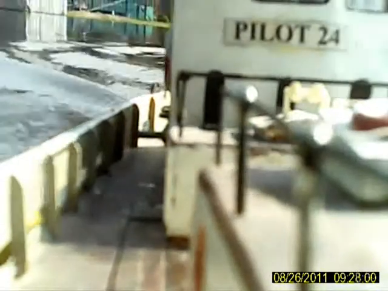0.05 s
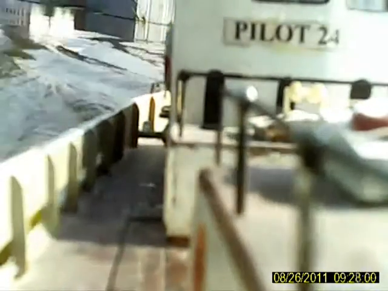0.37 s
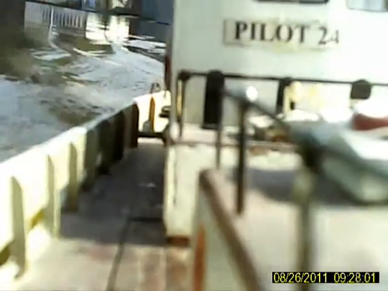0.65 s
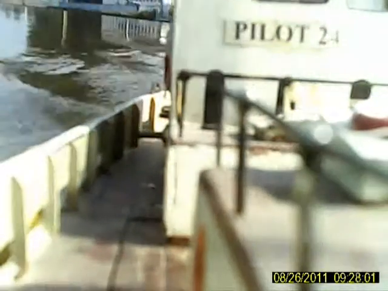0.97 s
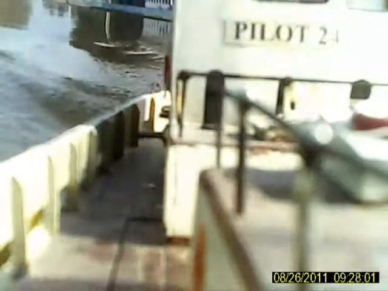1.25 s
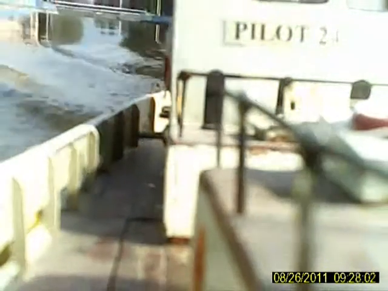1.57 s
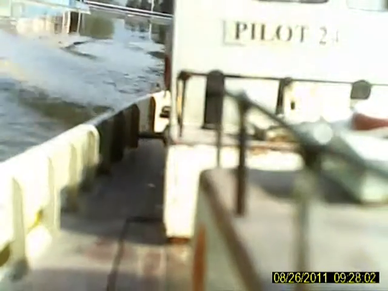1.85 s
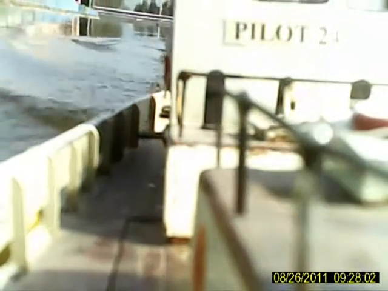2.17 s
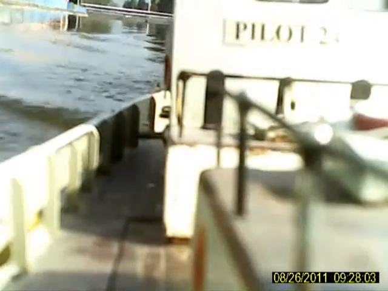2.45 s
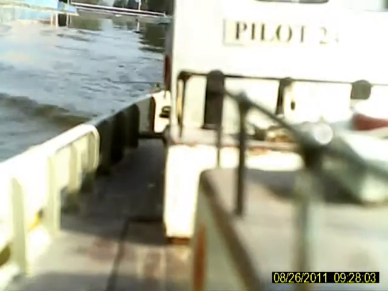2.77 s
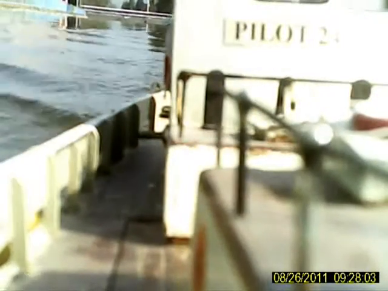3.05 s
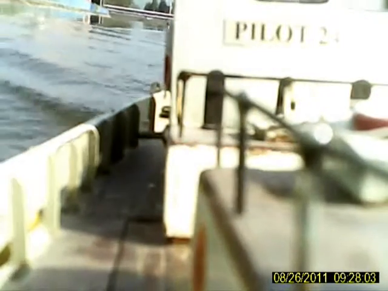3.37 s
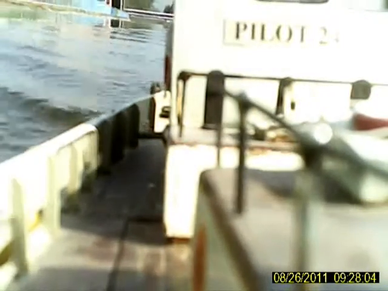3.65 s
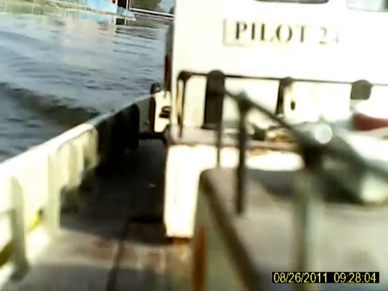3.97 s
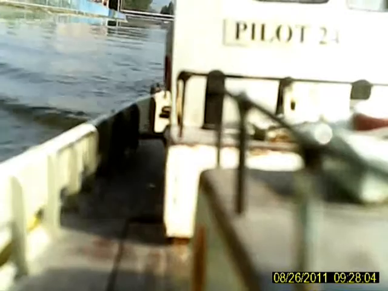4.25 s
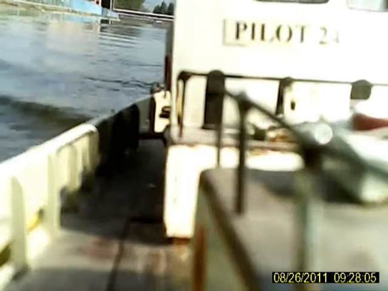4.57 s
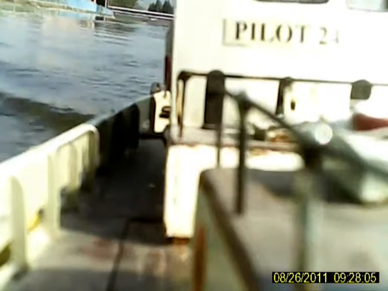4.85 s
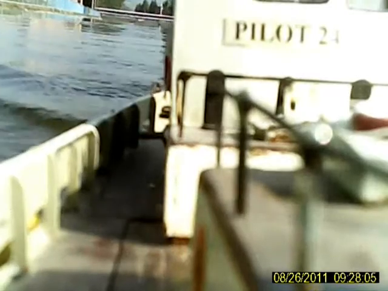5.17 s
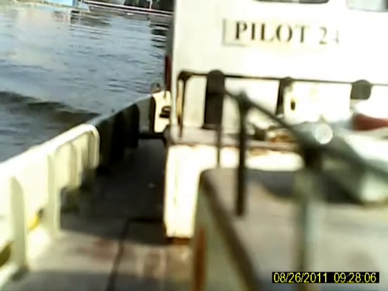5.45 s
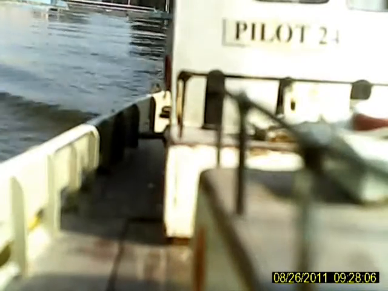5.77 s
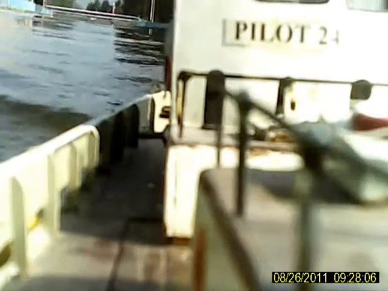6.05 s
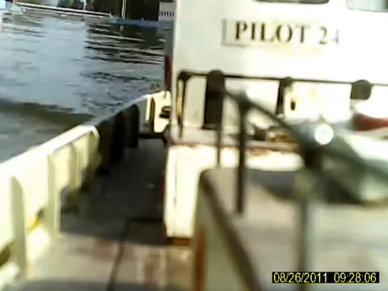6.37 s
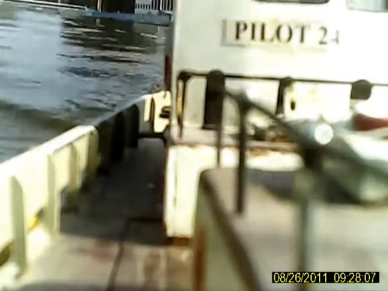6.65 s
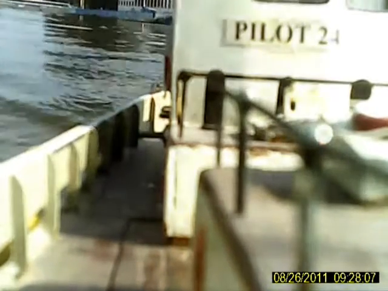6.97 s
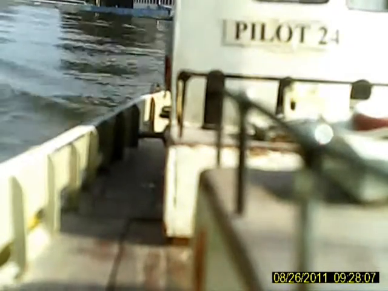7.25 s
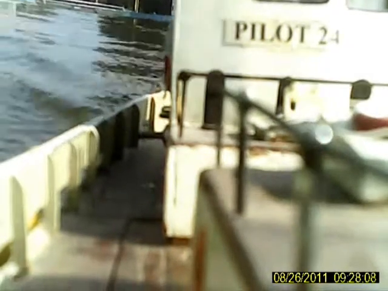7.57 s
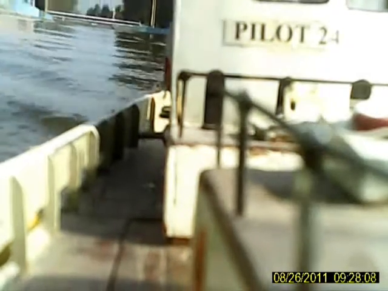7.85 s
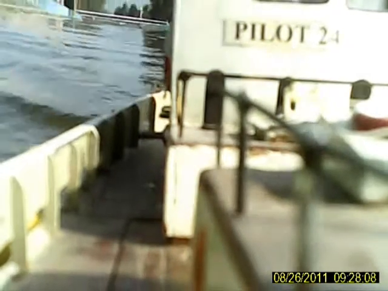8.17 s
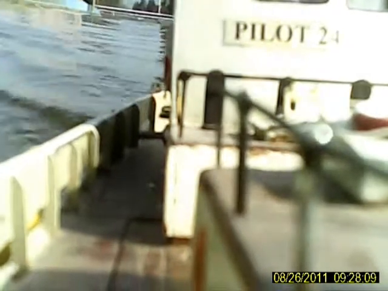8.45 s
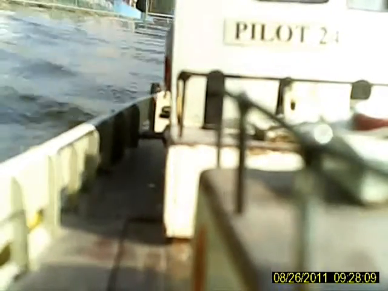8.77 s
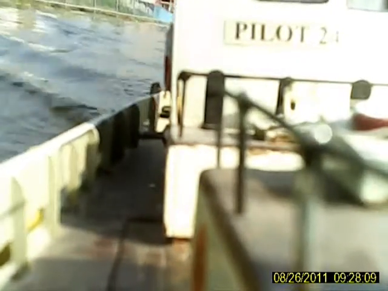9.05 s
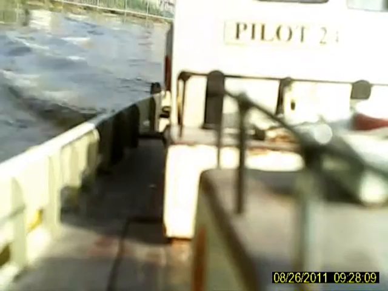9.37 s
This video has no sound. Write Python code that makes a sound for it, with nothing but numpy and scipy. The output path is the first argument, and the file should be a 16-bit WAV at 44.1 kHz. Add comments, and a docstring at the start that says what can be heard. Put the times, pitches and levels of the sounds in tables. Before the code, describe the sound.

A model boat's small geared electric motor whines from start to finish, about nine and a half seconds, heard very close from the deck. The whine is high and buzzy, with a fast, even flutter. A fine gear rattle, a thin electrical whistle and a fizzy hiss ride on it, growing slightly stronger when the motor runs faster. The pitch climbs a little over the first second or so, dips around 1.7 seconds, rises again near 2.3 and then wanders gently. Tiny upward blips come at about 4.6, 6.7 and 7.6 seconds. The motor sags to its lowest near 8.8 seconds and picks up just after 9. Underneath, water washes quietly along the hull, with soft, dull wavelet knocks at roughly 1.5, 2.6, 3.7 and 4.5 seconds and fainter ones near 5.7 and 6.8.

```python
"""A model boat's geared motor whines across calm water, heard close up from a small camera on deck.
The speed controller feeds it 38 pulses a second, so the whine swoops through the hull's resonances.
Around it the gears rattle, the brushes spark and the controller whistles; underneath, water washes
and knocks on the hull. The camera samples its microphone coarsely, which adds a fizzy top."""
import sys
import numpy as np
from scipy import signal
from scipy.fft import rfft, irfft, next_fast_len
from scipy.io import wavfile
from scipy.ndimage import map_coordinates

SR = 44100
rng = np.random.default_rng(int(sys.argv[2]) if len(sys.argv) > 2 else 0)


def dump(signal):
    """Clip the signal to [-1, 1] and save it as 16-bit WAV at the path in sys.argv[1]."""
    limited = np.clip(np.atleast_2d(signal).T, -1, 1)
    pcm = np.round(limited * 32767).astype(np.int16)
    wavfile.write(sys.argv[1], SR, pcm)


N = 419391
TIME = np.arange(N) / SR

# motor speed, as the mean rate of gear teeth meeting: (time [s], tooth rate [Hz])
MOTOR_SPEED = [(0.0, 704), (0.18, 699.4), (0.56, 790.4), (0.97, 778), (1.21, 831.6), (1.46, 756.6),
               (1.78, 744), (1.95, 794.6), (2.28, 813.3), (2.9, 741.5), (3.41, 769.3), (3.88, 767.6),
               (4.04, 732), (4.73, 701), (5.38, 700.2), (5.88, 764.4), (6.25, 742), (6.63, 779.4),
               (7.21, 706), (8.16, 682), (8.43, 690), (8.84, 653), (9.12, 762), (9.5, 748.5)]
# brief surges and stumbles of the motor: (time [s], change of tooth rate [Hz], half-width [s])
MOTOR_SURGES = [(4.558, 75.5, 0.01604), (4.643, 59.5, .022), (6.712, 32, .02), (7.646, 74, .025),
                (8.668, -33.5, 0.0312)]
# partials of the gear whine: (frequency [multiple of the tooth rate])
GEAR_ORDERS = [2 / 5, 1, 2, 3, 4]
# the same partials: (level [dB], growth [dB per 100 Hz of tooth rate], bite [dB per unit of push],
# flutter depth [0-1])
GEAR_PARTIALS = [(-15, 2.5, -10, 0.86), (-2, 2, 4, 0.26), (-1.64, 1.0, 0.5, 0.43), (-9.5, 3.5, -1, 0.27),
                 (-10, 9, 10.5, 0.33)]
# hull and deck resonances under the microphone: (frequency [Hz], width [Hz], gain [dB])
HULL_RESONANCES = [(304, 34.7, -16.5), (423.5, 40, -18.5), (520.7, 70.5, -11.5), (784, 185, -11.5),
                   (1439, 78, -17), (1619, 60.5, -9.5), (1768, 126, -7.5), (2043, 37, -16.5),
                   (2205, 286, -15), (2558, 72, -25), (2840, 49, -23.5), (3382, 155, -30)]
# spectrum of the rattle: (frequency [Hz], relative level [dB])
RATTLE_SPECTRUM = [(560, -75), (950, -15), (1320, -7.5), (1440, -21), (1540, -8), (1760, -29), (1920, -8.5),
                   (2250, -9.5), (2480, -10.5), (2860, -13.5), (3090, -20.5), (3590, -22), (4100, -17),
                   (4760, -22), (7800, -38.5), (10100, -60), (17200, -120)]
# spectrum of the water along the hull: (frequency [Hz], relative level [dB])
WASH_SPECTRUM = [(12, -35), (20, -18), (43, -5), (102, -8.5), (221, -5.5), (291, 0.5), (314, -41.5),
                 (354, -3), (460, -14), (600, -3), (1010, -120)]
# wavelets knocking at the waterline: (time [s], relative level [dB])
WAVELET_KNOCKS = [(1.519, -15), (1.536, -13), (2.558, -12), (3.655, -13), (4.543, -15), (5.749, -18),
                  (6.758, -18)]


def gears(tooth_hz, mean_hz, push, scrape_db=7.0):
    """Teeth meet with a fluttering force, coloured by speed and push, and scrape as they slide."""
    phase = 2 * np.pi * np.cumsum(tooth_hz) / SR
    haste = (mean_hz - mean_hz.mean()) / 100
    mesh = 0
    for order, (db, growth, bite, depth) in zip(GEAR_ORDERS, GEAR_PARTIALS):
        flutter = 1 + depth * noise_band(hz=75, width_hz=125)
        mesh += from_db(db + growth * haste + bite * push) * flutter * np.sin(order * phase)
    return np.sqrt(2) * mesh + from_db(scrape_db) * rng.standard_normal(N)


def motor_tooth_rate(mean_hz, push, wander_hz=3.49, jitter_hz=12):
    """The motor speeds up in each pulse; between pulses the propeller brakes it, harder at speed."""
    surge_hz = sum(rise * np.exp(-((TIME - s) / width) ** 2) for s, rise, width in MOTOR_SURGES)
    swing = 165 * (mean_hz / mean_hz.mean()) ** 0.51   # Hz per unit of push
    backlash = noise_band(hz=170, width_hz=260)   # play in the gears shakes the rate
    return mean_hz + swing * push + surge_hz + wander_hz * drift(9.78) + jitter_hz * backlash


def controller_push(pulse_hz=37.988, duty=0.74, fade=0.26, coil_s=0.0012, rotor_s=0.0014):
    """Pulses start sharply and die away, rounded by the coil and the rotor's inertia; mean 0."""
    cycle = (TIME * pulse_hz - 0.1974) % 1
    pulses = np.clip((duty - cycle) / fade, 0, 1)
    current = lag(pulses - pulses.mean(), coil_s)
    unevenness = 1 + 0.039 * drift(19.7)
    return lag(current, rotor_s) * unevenness


def hull(force, direct_db=-38):
    """The hull radiates at its resonances; a little of the drive reaches the microphone directly."""
    ringing = sum(from_db(db) * band(force, hz, width) for hz, width, db in HULL_RESONANCES)
    return ringing + from_db(direct_db) * force


def rattle_and_sparks(push, mean_hz, rattle_db=-22.0, grain_db=2.0, spark_db=-33.3):
    """Loose gears chatter in fine grains; the brushes spark while current flows, more at speed."""
    grains = rng.standard_normal(N) * from_db(grain_db * drift(250))
    sparks = noise_band(hz=5600, width_hz=2200) * from_db(6 * push)
    sparks *= (mean_hz / mean_hz.mean()) ** 3.3
    return from_db(rattle_db) * coloured(grains, RATTLE_SPECTRUM) + from_db(spark_db) * rms_one(sparks)


def controller_whistle(push, pitch_hz=4198, waver_hz=4, tone_db=-30.5, buzz_db=-27.0, depth=0.52):
    """An electrical whistle and the buzz around it swell with each pulse."""
    phase = 2 * np.pi * np.cumsum(pitch_hz + waver_hz * drift(26.5)) / SR
    tone = from_db(tone_db) * np.sqrt(2) * np.sin(phase)
    buzz = from_db(buzz_db) * noise_band(hz=4120, width_hz=400)
    return (tone + buzz) * (1 + depth * push)


def water(wash_db=-33, lap_db=-1.5, knock_db=-4, decay_s=0.01):
    """Just below the microphone, water washes along the hull and wavelets give short dull knocks."""
    lapping = from_db(wash_db + lap_db * drift(14.0))
    wash = lapping * coloured(rng.standard_normal(N), WASH_SPECTRUM)
    blows = sum(from_db(db) * (TIME > s) * np.exp(-np.abs(TIME - s) / decay_s)
                for s, db in WAVELET_KNOCKS)
    return wash + from_db(knock_db) * blows * noise_band(hz=380, width_hz=660)


def from_db(db):
    """Decibels to gain."""
    return 10 ** (np.asarray(db) / 20)


def rms_one(x):
    """Scale to unit power."""
    return x / np.sqrt(np.mean(x ** 2) + 1e-20)


def lag(x, seconds):
    """First-order inertia."""
    pole = np.exp(-1 / (seconds * SR))
    return signal.lfilter([1 - pole], [1, -pole], x)


def band(x, hz, width_hz):
    """A steep-sided resonance."""
    edges = np.clip([hz - width_hz / 2, hz + width_hz / 2], 10, .45 * SR)
    return signal.sosfilt(signal.butter(2, edges, "band", fs=SR, output="sos"), x + 1e-18)


def noise_band(hz, width_hz):
    """A band of noise at unit power."""
    return rms_one(band(rng.standard_normal(N), hz, width_hz))


def drift(rate_hz):
    """Smooth random wander at unit power, mostly slower than rate_hz."""
    size = next_fast_len(N, True)
    hz = np.arange(size // 2 + 1) * SR / size
    spectrum = rfft(rng.standard_normal(size)) / (1 + (hz / rate_hz) ** 2)
    return rms_one(irfft(spectrum, size)[:N])


def coloured(x, spectrum):
    """Shape x by points of (frequency [Hz], level [dB]); unit power."""
    hz, db = np.transpose(spectrum)
    size = next_fast_len(N, True)
    bin_hz = np.arange(1, size // 2 + 2) * SR / size
    gain = from_db(np.interp(np.log(bin_hz), np.log(hz), db))
    return rms_one(irfft(rfft(x, size) * gain, size)[:N])


def scene():
    """On deck, in mono, close to drive and water; rattle and whistle grow louder with speed."""
    mean_hz = np.interp(TIME, *np.transpose(MOTOR_SPEED))
    doublings = np.log2(mean_hz / mean_hz.mean())   # the gains below are dB per doubling of speed
    push = controller_push()
    tooth_hz = motor_tooth_rate(mean_hz, push)
    whine = from_db(-5.5 * doublings) * hull(gears(tooth_hz, mean_hz, push))
    rattle = from_db(3 * doublings) * rattle_and_sparks(push, mean_hz)
    whistle = from_db(10 * doublings) * controller_whistle(push)
    return (whine + rattle + whistle + water())[None]


def record(dry, input_cutoff_hz=7700, sampler_hz=16002, ceiling=0.85, output_cutoff_hz=15700):
    """The camera holds each slow sample, mirroring the whine into the treble; the tallest peaks clip."""
    input_filter = signal.butter(8, input_cutoff_hz, fs=SR, output="sos")
    output_filter = signal.ellip(12, .1, 80, output_cutoff_hz, fs=SR, output="sos")
    narrow = signal.sosfilt(input_filter, dry[0])
    held_at = np.floor(TIME * sampler_hz) * SR / sampler_hz
    held = map_coordinates(narrow, [held_at], order=3, mode="nearest")
    return signal.sosfilt(output_filter, np.clip(held, -ceiling, ceiling))[None]


dry = scene()
out = record(dry)
dump(out)
```